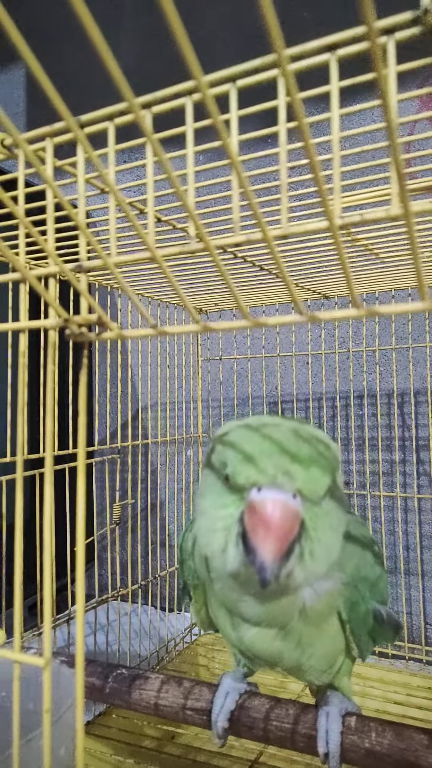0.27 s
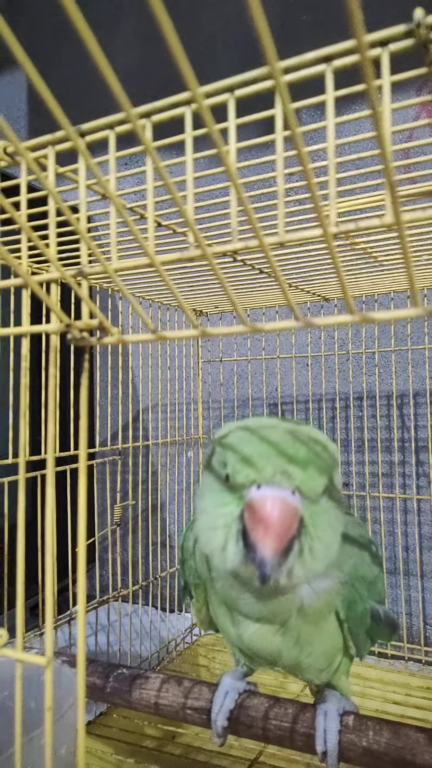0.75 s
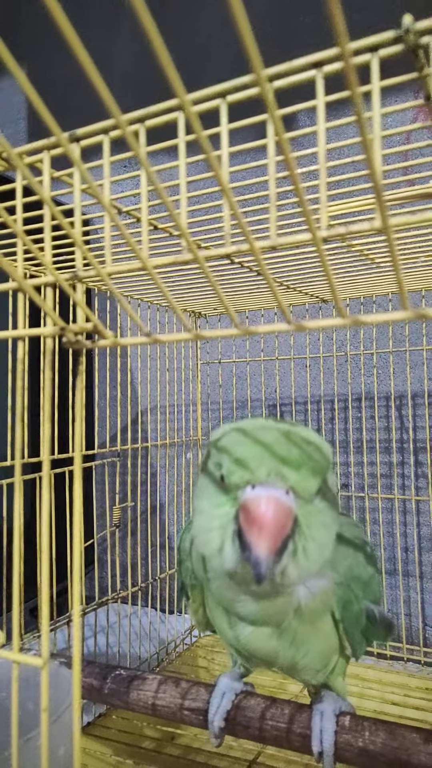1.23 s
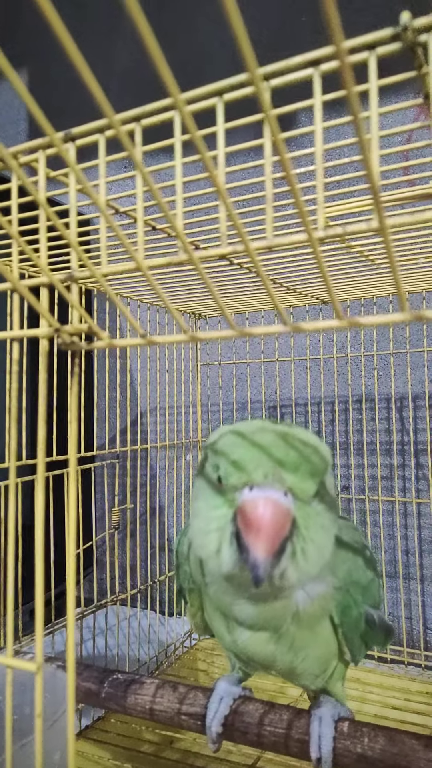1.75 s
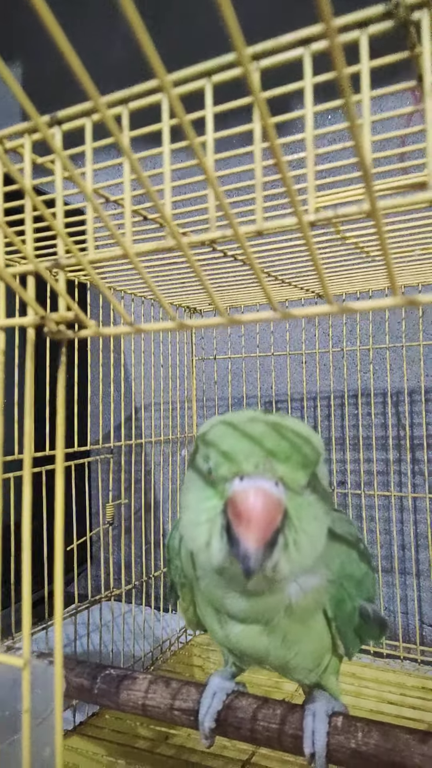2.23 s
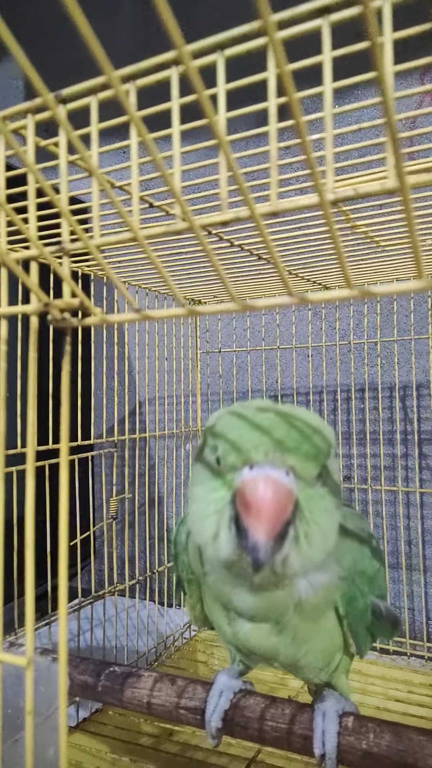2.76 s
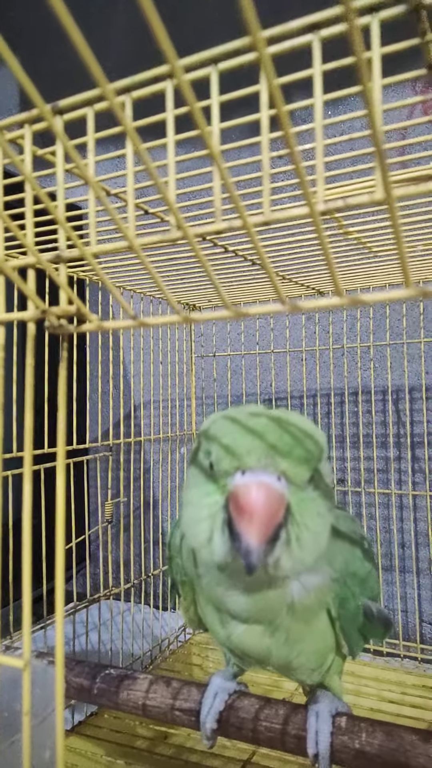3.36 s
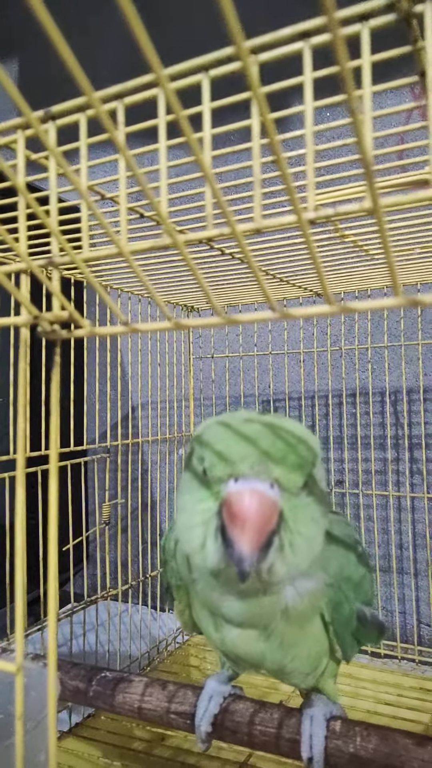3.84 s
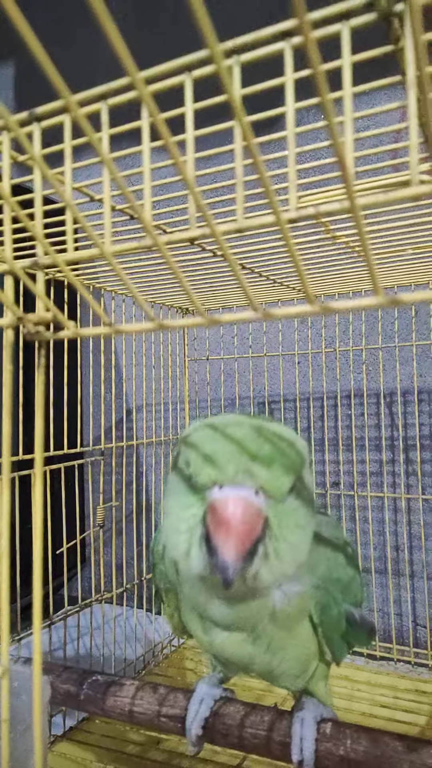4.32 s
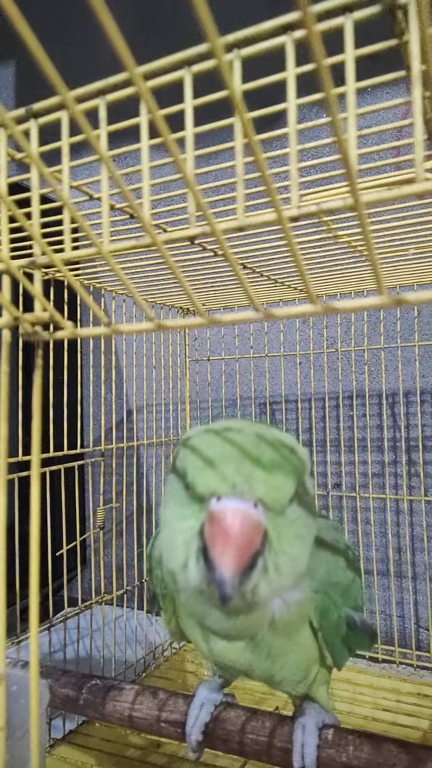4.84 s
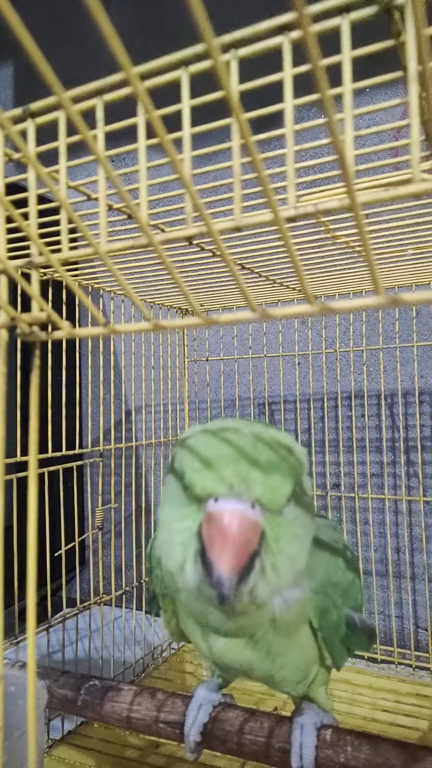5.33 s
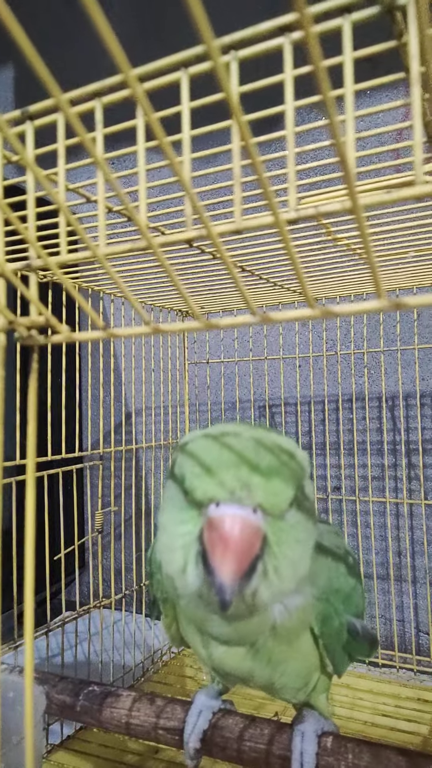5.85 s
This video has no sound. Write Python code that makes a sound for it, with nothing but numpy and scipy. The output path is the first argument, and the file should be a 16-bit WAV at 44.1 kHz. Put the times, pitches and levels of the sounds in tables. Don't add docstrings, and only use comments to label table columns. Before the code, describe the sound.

A caged parakeet gives sparse clucks, bright chirps and sliding squeaks with two sharp beak clicks, over low hum and soft room hiss.

```python
import sys
import numpy as np
from scipy import signal
from scipy.fft import rfft, irfft
from scipy.io import wavfile
from scipy.ndimage import uniform_filter1d

SR = 44100
rng = np.random.default_rng(int(sys.argv[2]) if len(sys.argv) > 2 else 0)


def inscribe(sig):
    pcm = np.round(np.clip(np.atleast_2d(sig).T, -1, 1) * 32767)
    wavfile.write(sys.argv[1], SR, pcm.astype(np.int16))


def undo_db(level):
    steps = np.asarray(level, float) / 20
    return 10 ** steps


N = 268128

# frequency in Hz, density in dB per Hz.
AIR_COLOUR = [(22, -8), (33, -23), (70, -22.5), (90, -11), (135, -26.5), (170, -17.5), (650, -16),
              (850, -20.5), (3200, -32.5), (3950, -46.5), (4500, -42), (6900, -50.5), (7700, -56.5),
              (14000, -60.5)]
# frequency in Hz, left-right correlation (-1 to 1).
AIR_CORRELATION = [(60, 0.91), (200, 0.98), (500, 0.78), (900, -0.41), (1300, 0.26), (2200, -0.061),
                   (4000, -0.034), (9000, -0.045)]
# centre in seconds, width in seconds, change in dB.
TRAFFIC = [
    (0.0, .15, 5),
    (.83, .1, 3),
    (4.1, .3, 2),
    (2.9, .6, -2.5),
]
# frequency in Hz, level in dB rms.
MOTOR_LINES = [(48.4, -45.5), (96.8, -65), (171, -65.5)]

# start in seconds, length in seconds, first pitch in Hz, held pitch in Hz, level in dB.
CLUCKS = [
    (0.365, 0.057, 1070, 765, -38.5),
    (0.584, 0.065, 1140, 805, -39),
    (1.445, 0.038, 608, 552.6, -39),
    (2.99, 0.029, 2050, 1420, -43),
    (3.389, 0.052, 606, 562.7, -40.5),
]
CHIRPS = [
    (1.025, 0.074, 1376, 1304, -26.5),
    (1.644, 0.058, 1117, 980.5, -40),
    (3.583, 0.063, 1195, 1049, -39),
]
# beak opening in dB, windpipe resonance in Hz.
NOTE_THROATS = [(-9, 1800), (-8, 2200), (-14, 1400), (-1, 3000), (-15, 1300), (-13, 2650), (-6, 2550),
                (-8, 2130)]
# time in seconds, pitch in Hz, level in dB, beak opening in dB, windpipe resonance in Hz.
EARLY_SLIDES = [
    [(0.925, 1317, -41.5, -35, 2800), (0.953, 1339, -30.5, -46, 2800), (0.999, 1547, -41, -13, 2900),
     (1.024, 1419, -31.5, -23, 2800)],
    [(2.246, 1376, -39, -7, 2700), (2.27, 1323, -36, -7, 2800), (2.3, 1433, -36.5, -6, 3300),
     (2.315, 1547, -41, -3.5, 3300)],
    [(2.537, 1140, -44, -26, 2250), (2.565, 994, -44.5, -23, 2050), (2.679, 828, -44, -28, 2300),
     (2.735, 697.5, -38.5, -21, 3050), (2.793, 637, -36, -25, 4400), (2.825, 520, -50, -24, 4400)],
]
LATE_SLIDES = [
    [(4.178, 1588, -43, -2, 3600), (4.195, 1553, -39.5, 11, 3400), (4.24, 1388, -33, -5.5, 3300),
     (4.26, 1334, -59, -10, 3000)],
    [(4.495, 1950, -39, -23, 5500), (4.518, 1810, -44.5, -22, 5300), (4.597, 1676, -40.5, -28, 5100),
     (4.693, 1680, -40, -28, 5300), (4.785, 1798, -39.5, -17, 5500), (4.85, 2066, -24.5, -19, 6200),
     (4.875, 2320, -46, -27, 6500)],
    [(5.16, 690, -46, -40, 1380), (5.206, 739, -40, -34, 1800), (5.264, 838, -39, -8, 2500),
     (5.306, 911, -40.5, 5.5, 2750), (5.34, 895, -44, -5, 2100)],
    [(5.432, 1036, -40.5, -3.5, 2600), (5.488, 748, -43, -28, 2100), (5.54, 696, -37.5, -22, 1850),
     (5.596, 796, -39, -5, 2380), (5.63, 875.5, -43, -4, 2400), (5.65, 861, -47.5, -16, 2500)],
]
# windpipe gain in dB, low overtones in dB,
# mouth ring in Hz, beak ring in Hz, partials above 9 kHz in dB.
VOICES = [(2, -2, 6050, 10600, -7), (8, -2, 3600, 9800, -7.5), (6, 2, 6550, 10500, -6.5),
          (8, 0, 5800, 10100, -25), (8, 0, 6200, 10500, -8.5), (22, -11, 5260, 10600, -7.5),
          (15, 8, 4470, 10500, -26), (21, -3, 3900, 10000, -16), (1, -10, 6000, 9400, 2),
          (13, -3, 6600, 9800, -12), (17, 2, 4200, 11500, -3), (6, 4, 7000, 13800, -30),
          (8, -11, 5900, 11900, 3), (17, -1, 7600, 10400, -12), (19, -1, 4780, 10500, -14)]
# breath share (0 to 1) at start, middle and end, sideband level in dB.
HOARSENESS = [(.45, .5, .65, -16), (.2, .25, .4, -22), (.7, .75, .8, -21), (.9, .8, .8, -8),
              (.7, .7, .75, -22), (.02, .015, .02, -16.5), (.1, .06, .1, -28), (.05, .12, .3, -34),
              (.04, .04, .1, -18), (.03, .04, .2, -22), (.01, .12, .92, -27), (.015, .02, .08, -17.5),
              (.01, .008, .06, -18), (.08, .15, .05, -22), (.75, .25, .1, -20)]
# frequency in Hz, gain in dB.
UPPER_COLOUR = [(600, -4.5), (2000, 3.5), (3500, 13), (4000, 4.5), (5000, 5.5), (6500, 2), (8200, -5.5),
                (9000, 0.5), (10500, -6), (12200, -6), (14000, -0.5), (14800, -8.5), (15800, -37)]
# time in seconds, peak in dB, ring in Hz, ring T60 in ms, crack re ring in dB.
CLICKS = [
    (2.0478, -18, 2184, 10, -7),
    (2.221, -62, 2200, 8, 9),
    (5.4335, -17.5, 2084, 43, -13.5),
]
# frequency in Hz, width in Hz, gain in dB.
BEAK_MODES = [(700, 100, 8), (1287, 210, 10), (2880, 340, 5), (4550, 500, -1), (6700, 720, -1.5),
              (10700, 4000, -18)]

# time in seconds, pitch in Hz, level in dB.
HOWL_CURVE = [
    (0.68, 427, -54),
    (0.78, 650, -43),
    (0.902, 728.4, -47),
    (1.03, 727, -44.5),
    (1.11, 638, -43),
    (1.2, 509.4, -47.5),
    (1.28, 500, -58),
]
# multiple of the pitch, level in dB.
HOWL_OVERTONES = [(3, -22), (5, -22)]

# delay in ms, left gain, right gain.
NEAR_ECHOES = [(3.1, 0.11, 0.14), (7.6, 0.0058, 0.18)]
# frequency in Hz, level in dB, phase in radians.
PORT_DIFFERENCE = [(100, -10.5, 3.5), (650, 7, -0.44), (1040, -1.5, -1.87), (1380, 2.5, -2),
                   (1840, -1, -2.5), (2100, -20.5, -0.8), (2620, 1.5, -0.5), (2840, 0.5, -2.5),
                   (4090, 0.5, -2.5), (4800, -2, -8), (5650, -8, -4), (6470, -6, -7.5), (7200, -14, -6),
                   (8300, -10.5, -6.5), (9500, -13, -11.5), (12500, 5, -10.5), (14200, 19, -14)]
# frequency in Hz, T60 in seconds, level in dB.
ROOM_BANDS = [(696, 0.48, -21.5), (2380, 0.37, -23.5), (2500, 0.092, -13.5), (6030, 0.42, -25)]

AIR_DB = -49
RUSTLE_DB, RUSTLE_T60_S = -44.5, .33
# pitch settling in s, end lift (share of pitch), level swell in dB, beak shut at both ends in dB
CLUCK_MANNER, CHIRP_MANNER = (.014, .09, -6, -2), (.012, .025, 4, -9)
RELEASE_S, RELEASE_DB = 0.021, -9.5
RING_DB, SIDEBAND_HZ = 10, 350
WINDPIPE_WIDTH_HZ = 516
OVERTONE_SHARE, OVERTONE_DB = .55, -1
JITTER, HOARSE_JITTER = .002, .008


def on_log(table, hz):
    t = np.array(table, float)
    return np.interp(np.log(hz), np.log(t[:, 0]), t[:, 1])


def unit(x):
    return x / np.sqrt(np.mean(x ** 2))


def band(x, hz, width_hz):
    return signal.lfilter(*signal.iirpeak(min(hz, .45 * SR), hz / width_hz, SR), x)


def bins(size):
    return np.arange(size // 2 + 1) * SR / size + .01


def shaped(x, gain):
    return irfft(rfft(x) * gain, x.shape[-1])


def walk(rate_hz, size):
    hold = int(SR / rate_hz)
    steps = np.repeat(rng.standard_normal(size // hold + 1), hold)
    return 1.277 * uniform_filter1d(uniform_filter1d(steps, hold), hold)[:size]


def play(table, rise_s, fall_s):
    s, *columns = np.transpose(table)
    start, end_s = int(s[0] * SR), s[-1] + fall_s
    t = np.arange(start, int(end_s * SR)) / SR
    gate = np.clip((t - s[0]) / rise_s, 0, 1) * np.clip((end_s - t) / fall_s, 0, 1)
    return start, [np.interp(t, s, c) for c in columns], gate


def air():
    f, t = bins(N), np.arange(N) / SR
    swell_db = sum(db * np.exp(-((t - s) / width_s) ** 2) for s, width_s, db in TRAFFIC)
    alike = np.clip(on_log(AIR_CORRELATION, f), -.999, .999)
    colour = undo_db(on_log(AIR_COLOUR, f)) * np.clip((15000 - f) / 900, .01, 1) ** 2
    mid = rfft(rng.standard_normal(N)) * colour * np.sqrt(1 + alike)
    side = rfft(rng.standard_normal(N)) * colour * np.sqrt(1 - alike)
    pair = np.array([mid + side, mid - side])
    out = 0
    for hz in 15 * 2 ** np.arange(0, 10.5, .5):
        share = np.clip(1 - 2 * np.abs(np.log2(f / hz)), 0, 1) ** .5
        patchy_db = 3.2 * walk(30, N) if hz > 3000 else 0
        flicker_db = swell_db * (110 < hz < 500) + 0.63 * walk(3.84, N) + patchy_db
        out = out + undo_db(flicker_db) * irfft(pair * share, N)
    return undo_db(AIR_DB) * unit(out)


def hum():
    turn = 2 * np.pi * np.cumsum(1 + 0.00595 * walk(2.454, N)) / SR
    x = sum(np.sqrt(2) * undo_db(db + 0.26 * walk(6, N)) * np.sin(hz * turn) for hz, db in MOTOR_LINES)
    return x * undo_db(np.array([[-.55], [.55]]))


def rustle():
    noise = band(band(rng.standard_normal((2, N)), 2100, 2400), 2200, 6000)
    return unit(noise) * undo_db(RUSTLE_DB - 60 * np.arange(N) / SR / RUSTLE_T60_S)


def note(start, length, first_hz, hz, db, open_db, pipe_hz, settle_s, lift, swell_db, shut_db):
    t = np.linspace(0, length, num=16)
    settle = np.exp(-t / settle_s)
    release = np.clip(1 - (length - t) / RELEASE_S, 0, 1)
    pitch = hz * (1 + lift * (t / length) ** 3) + (first_hz - hz) * settle
    level = db + swell_db * (t / length - .5) + RELEASE_DB * release
    opening = open_db + shut_db * (settle + release)
    return np.transpose([start + t, pitch, level, opening, pipe_hz + 0 * t])


def throat(f, mouth_hz, beak_hz, top_db):
    mouth, beak = (np.exp(-((f - hz) / 800) ** 2) for hz in (mouth_hz, beak_hz))
    treble_db = top_db * np.clip((f - 8300) / 600, 0, 1)
    return undo_db(on_log(UPPER_COLOUR, f) + RING_DB * (mouth + beak) + treble_db) * (f < 15800)


def call(table, hoarse, sideband_db, pipe_db, overtone_db, *rings):
    start, (hz, db, open_db, pipe_hz), gate = play(table, rise_s=0.0035, fall_s=0.0026)
    size, upper_db = len(hz), db + open_db
    hz = uniform_filter1d(hz, min(size // 8, 600), mode="nearest")
    breath = np.interp(np.linspace(0, 2, size), [0, 1, 2], hoarse)
    jitter = (JITTER + HOARSE_JITTER * breath) * walk(400, size)
    turn = 2 * np.pi * np.cumsum(hz * (1 + jitter)) / SR
    k = np.arange(1, 29)[:, None]
    f = k * hz

    upper = throat(f, *rings)
    power = np.sum(upper ** 2 * (f > 4200) * (f < 9000), axis=0)
    upper = upper * undo_db(upper_db) * np.sqrt((1 - breath) / power)
    pipe = pipe_db / (1 + ((f - pipe_hz) / WINDPIPE_WIDTH_HZ) ** 2)
    low_db = db + (k > 1) * (overtone_db + OVERTONE_SHARE * open_db + OVERTONE_DB * (k - 2) + pipe)
    low_share = np.maximum(np.clip((3900 - f) / 900, 0, 1), k < 4)
    shape = (upper + 1e-9) ** (1 - low_share) * undo_db(low_share * low_db)
    flutter_db = np.array([2.1 * walk(46.4, size) for _ in k])
    shape = shape * undo_db(flutter_db * np.minimum(k / 5 + .08, 1))

    pulse = np.cos(k * turn - 0.38 * k)
    second = 2 * np.pi * SIDEBAND_HZ * np.arange(size) / SR
    sideband = undo_db(sideband_db - 12 * (k == 1)) * np.cos(k * turn - second)
    tone = -np.sum(shape * (pulse + sideband), axis=0)

    noise, noise_hz = rng.standard_normal(size), bins(size)
    hiss = undo_db(upper_db + 1) * unit(shaped(noise, throat(noise_hz, *rings) * (noise_hz > 3300)))
    rasp = undo_db(low_db[2] - 12) * unit(band(band(noise, 2700, 1600), 2700, 1600))
    puffs = np.sqrt(breath) * (hiss + rasp) * (1 + 0.31 * np.cos(turn))
    return start, gate * (np.sqrt(2) * tone + puffs)


def beak_click(db, ring_hz, t60_ms, crack_db):
    t = np.arange(1200) / SR
    snap = rng.standard_normal(len(t)) * np.exp(-t / 0.0013) * np.clip(t / 0.00044, 0, 1)
    crack = sum(undo_db(g) * band(band(snap, hz, 2 * w), hz, w) * np.sqrt(1000 / w) for hz, w, g in BEAK_MODES)
    ring = -np.sin(2 * np.pi * ring_hz * t) * np.clip(t / 0.00056, 0, 1) * undo_db(-6e4 * t / t60_ms)
    return undo_db(db) * (ring + undo_db(crack_db) * crack / np.abs(crack).max())


def parakeet():
    out = np.zeros((2, N))
    manners = [CLUCK_MANNER] * len(CLUCKS) + [CHIRP_MANNER] * len(CHIRPS)
    short = zip(CLUCKS + CHIRPS, NOTE_THROATS, manners)
    notes = [note(*row, *opening, *manner) for row, opening, manner in short]
    tables = notes + EARLY_SLIDES + LATE_SLIDES
    for table, (*hoarse, sideband_db), voice in zip(tables, HOARSENESS, VOICES):
        start, x = call(table, hoarse, sideband_db, *voice)
        out[:, start:start + len(x)] += x
    for s, *click in CLICKS:
        x = beak_click(*click)
        out[:, int(s * SR):int(s * SR) + len(x)] += x
    return out


def howl():
    start, (hz, db), gate = play(HOWL_CURVE, rise_s=0.018, fall_s=0.035)
    size = len(hz)
    turn = 2 * np.pi * np.cumsum(uniform_filter1d(hz, 2000, mode="nearest")) / SR
    rough = np.sin(turn + .9 * walk(50, size)) * undo_db(4.5 * walk(75, size))
    overtones = sum(undo_db(g) * np.sin(k * turn) for k, g in HOWL_OVERTONES)
    x = rough + np.clip((hz - 690) / 30, 0, 1) * overtones
    return np.pad(np.sqrt(2) * x * undo_db(db) * gate, (start, N - start - size))


def near_echoes(x):
    return sum(np.roll(x, int(ms * SR / 1000), axis=1) * np.array([[left], [right]])
               for ms, left, right in NEAR_ECHOES)


def ports(x):
    hz, db, rad = np.transpose(PORT_DIFFERENCE)
    f = bins(N)
    left = undo_db(np.interp(f, hz, db) / 2) * np.exp(.5j * np.interp(f, hz, rad))
    pair = np.array([left, 1 / left])
    return shaped(x, pair / np.maximum(np.abs(pair.mean(axis=0)), .45))


def walls(x):
    t = np.arange(SR // 2) / SR
    noise = rng.standard_normal((2, len(t)))
    x = np.interp(np.arange(N) + .00024 * SR * walk(30, N), np.arange(N), x)
    tail = sum(undo_db(db - 60 * t / t60_s) * band(noise, hz, 1.4 * hz) * np.sqrt(SR / hz / t60_s)
               for hz, t60_s, db in ROOM_BANDS)
    tail = tail * np.clip(t / 0.0032, 0, 1) * 2 / np.sqrt(SR)
    return signal.fftconvolve(x[None], tail, axes=1)[:, :N]


def scene():
    bird, far = parakeet(), howl()
    direct = ports(bird + near_echoes(bird) + far)
    room = walls(bird.mean(axis=0) + 2 * far)
    return direct + room + rustle() + air() + hum()


def low_pass(x):
    return signal.sosfilt(signal.butter(12, 15810, fs=SR, output="sos"), x)


def record(dry):
    return low_pass(dry)


dry = scene()
out = record(dry)
inscribe(out)
```